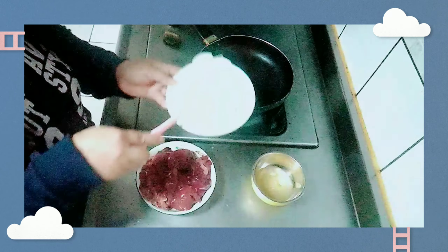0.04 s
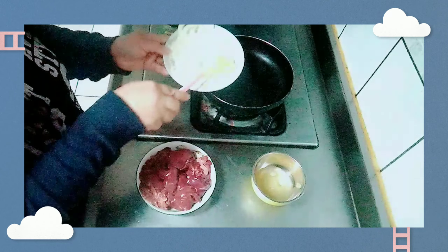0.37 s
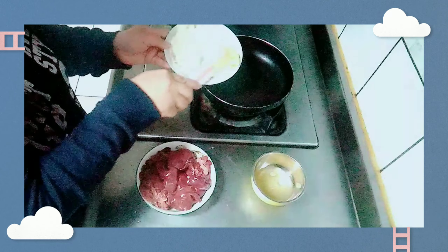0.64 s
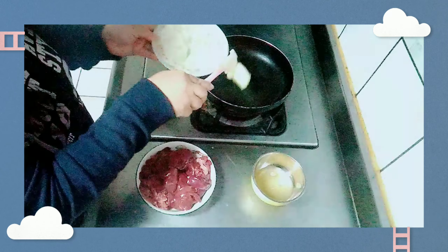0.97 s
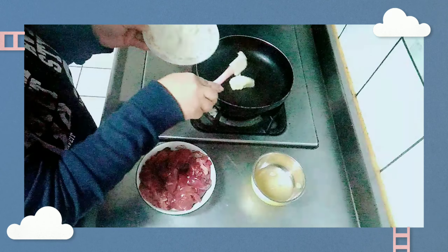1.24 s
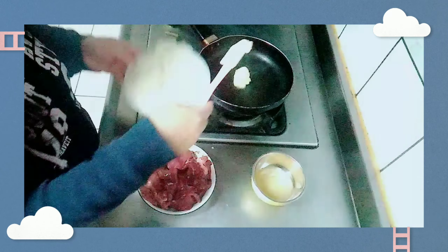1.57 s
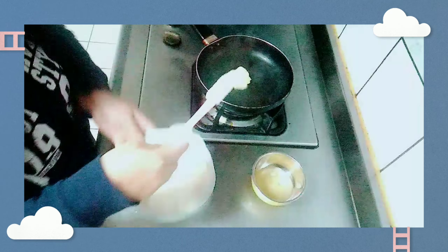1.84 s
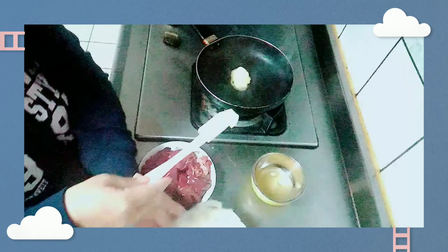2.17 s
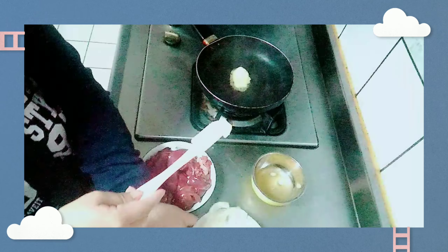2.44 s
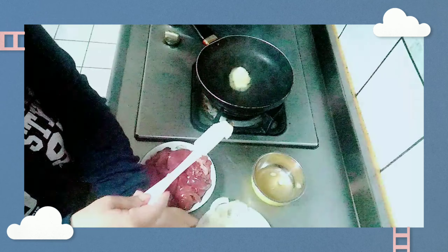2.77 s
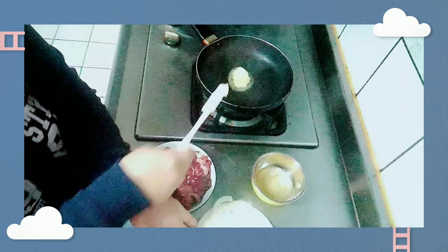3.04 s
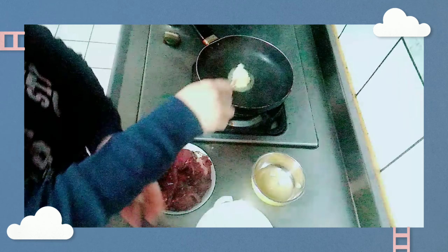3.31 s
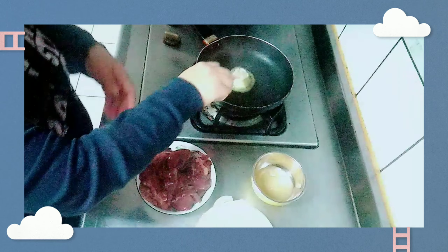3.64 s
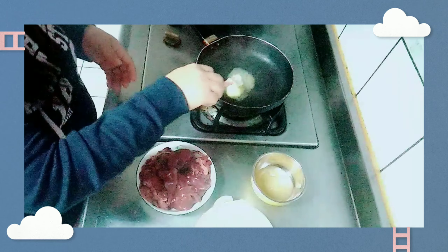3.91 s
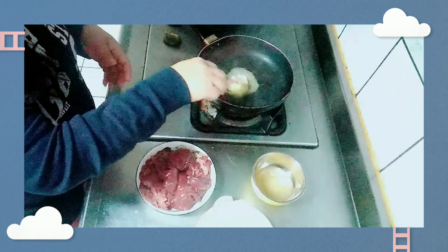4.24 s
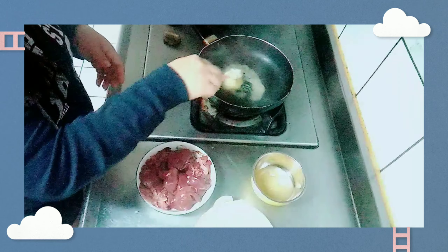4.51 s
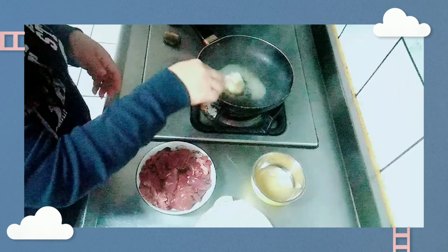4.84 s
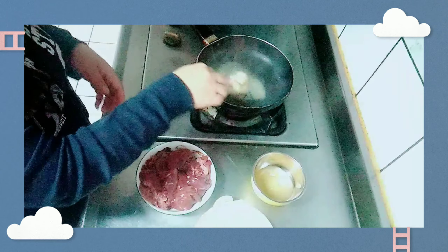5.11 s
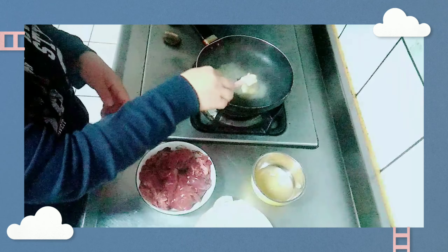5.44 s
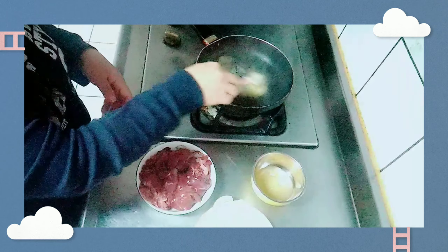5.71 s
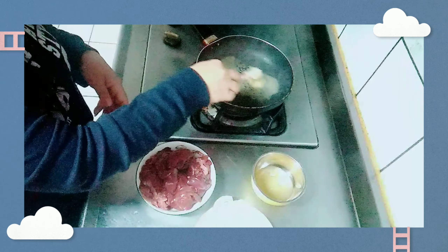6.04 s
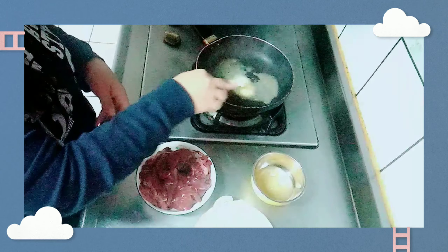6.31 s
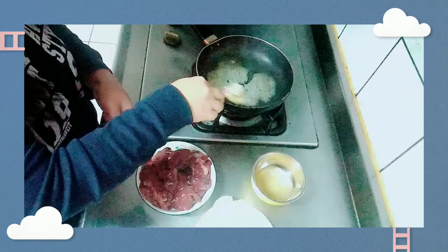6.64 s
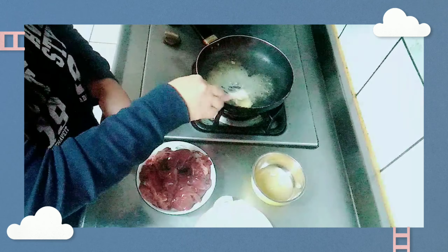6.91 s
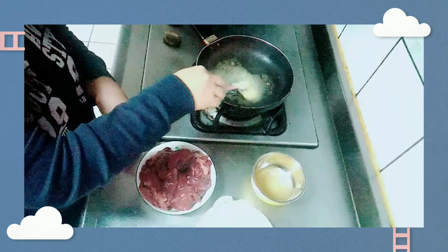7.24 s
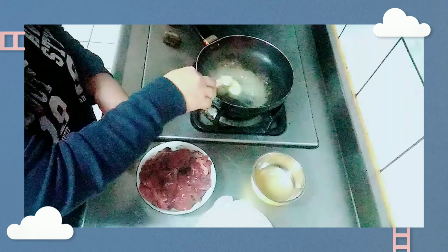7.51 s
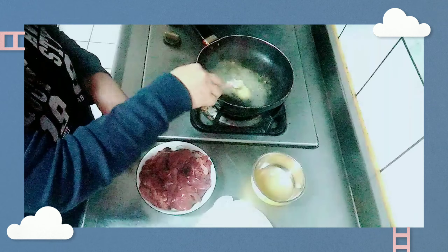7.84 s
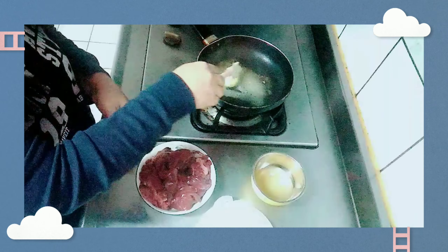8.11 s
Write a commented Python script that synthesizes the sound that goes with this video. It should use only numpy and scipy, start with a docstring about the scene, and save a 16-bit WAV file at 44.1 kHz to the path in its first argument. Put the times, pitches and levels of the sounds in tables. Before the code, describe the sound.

Butter sizzles and spits in a hot frying pan as a spatula stirs, with a plate knocking twice on a steel counter.

```python
"""Butter sizzles in a hot frying pan: its water boils out as tiny steam bubbles that fizz and shake the
pan, and bursting drops spit ever more often. The lump slides off a plate with a rustle and lands with
thuds and a splat; the plate is set on the steel counter with two ringing knocks. A spatula bumps,
ticks and squeaks on the pan, and the fizz swells as it spreads the fat. A gas burner rushes underneath.
The kitchen is small and tiled; the sound is mono, with the top treble cut off."""
import sys
import numpy as np
from scipy import signal
from scipy.fft import rfft, irfft, next_fast_len
from scipy.io import wavfile
from scipy.ndimage import uniform_filter1d

SR = 44100
rng = np.random.default_rng(int(sys.argv[2]) if len(sys.argv) > 2 else 0)


def transcribe(signal):
    """Save signal, clipped to [-1, 1], as a 16-bit WAV file at the path in sys.argv[1]."""
    frames = np.atleast_2d(signal).T
    limited = np.clip(frames, -1, 1)
    pcm = np.round(limited * 32767).astype(np.int16)
    wavfile.write(sys.argv[1], SR, pcm)


N = 369116
T = np.arange(N) / SR

# spatula strokes spreading fat over hot metal: (start [s], length [s], fizz lift [dB])
STROKES = [(3.45, 0.78, 1.3), (4.13, 0.89, 3), (5.323, 0.77, 5), (6.128, 0.88, 3), (7.48, 0.55, 1.2)]

def sizzle(land_s=0.85, touch_s=0.025, warm_up_s=0.3, drying_db_per_s=0.34, splash_t60_s=0.45):
    """The butter lands with a hiss, heats up, boils off its water in spurts and slowly dries."""
    age = since(land_s)
    strokes = [(arch(s, length, skew=0.87), db) for s, length, db in STROKES]
    stirring = sum(swell for swell, _ in strokes)
    lift_db = sum(db * swell for swell, db in strokes)
    splash = amp(-60 * age / splash_t60_s)
    cold_db = -23.5 * np.exp(-age / warm_up_s)
    boil = amp(-38 + cold_db - drying_db_per_s * age + lift_db)
    spurts = amp(0.94 * wander(rate_hz=24) - 0.11 * wander(rate_hz=7.8))
    frying = np.hypot(boil, amp(-46) * splash) * spurts * foam(age, stirring)
    return np.minimum(age / touch_s, 1) * (frying + pan_hum(lift_db, splash))


# fizz under the solid lump: (frequency [Hz], relative density [dB])
LUMP_SPECTRUM = [(1470, -45), (2500, -12.5), (2940, -13.5), (3180, -6.5), (3360, -3.5), (4290, -3),
                 (4680, -2), (6350, 1), (7360, -4.5), (7710, -17.5), (8450, -34), (11000, -67),
                 (18600, -120)]
# higher, thinner fizz: (frequency [Hz], relative density [dB])
THIN_SPECTRUM = [(1470, -43.5), (2500, -15.5), (2990, -24), (3540, -13), (4180, -5.5), (4560, -8),
                 (4970, -3), (6160, 2.5), (6790, 0), (7360, -8.5), (7750, -15), (8150, -38), (8450, -30),
                 (11000, -72.5), (18600, -120)]
# coarse bubbles: (frequency [Hz], relative density [dB])
COARSE_SPECTRUM = [(300, -27), (600, -11.5), (1000, -5), (1600, 3), (2200, 1), (2800, 3.5), (3400, 5),
                   (4500, -25.5)]
# thin fizz, all at landing, almost none by 1.75 s, then partly back: (time [s], share [0-1])
THIN_SHARE = [(0.9, 1), (1.35, 0.8), (1.75, 0.04), (3.2, 0.23), (4.5, 0.62), (8.3, 0.61)]

def foam(age, stirring, coarse_db=-16.5, stirred_db=2.5):
    """Fine bubbles shift between a fuller and a thinner fizz; stirring brings up the coarse ones."""
    thin = np.interp(T, *np.transpose(THIN_SHARE))
    spread_db = 0.75 + 0.266 * age  # sizes grow more unequal as the fat heats
    fine = bubbles(per_s=5000, spread_db=spread_db, lo_hz=2116, hi_hz=8520, cycles=2.1, room_db=-2)
    fizz = (1 - thin) * coloured(fine, LUMP_SPECTRUM) + thin * coloured(fine, THIN_SPECTRUM)
    coarse = bubbles(per_s=2200, spread_db=spread_db, lo_hz=517, hi_hz=4010, cycles=0.67, room_db=4)
    return fizz + amp(coarse_db + stirred_db * stirring) * coloured(coarse, COARSE_SPECTRUM)


def bubbles(per_s, spread_db, lo_hz, hi_hz, cycles, room_db, pitches=12, spot_count=4):
    """Steam bubbles burst at random, each a short ping; most are tiny, a few large."""
    sizes = amp(spread_db * np.minimum(rng.exponential(1, N), 5))
    sizes /= np.sqrt(uniform_filter1d(sizes ** 2, size=20001))
    bursts = sizes * (rng.random(N) < per_s / SR)
    pitch_index = rng.integers(0, pitches, N)
    t = np.arange(512) / SR
    spots = np.zeros((spot_count, N))  # each spot in the pan has its own echoes
    for k, hz in enumerate(np.linspace(lo_hz, hi_hz, pitches)):
        ping = np.sin(2 * np.pi * hz * t) * np.exp(-t * hz / cycles)
        spots[k % spot_count] += signal.oaconvolve(bursts * (pitch_index == k), unit_rms(ping))[:N]
    return sum(spot + amp(room_db) * kitchen(spot)[:N] for spot in spots)


# lower pan modes rung by the boiling: (frequency [Hz], width [Hz], gain [dB])
BOIL_MODES = [(309.2, 49, -43.5), (712, 88, -46.5), (933, 120, -47), (1077, 38, -48)]

def pan_hum(lift_db, splash, seated_s=1.038, rise_s=0.21, fade_s=0.23, sag_s=0.6):
    """Boiling shakes the pan bottom; the hum sags and fades as the lump melts."""
    age = since(seated_s)
    level_db = -49 - 16 * np.log10(1 + age / fade_s) + 0.8 * lift_db
    drive = np.minimum(age / rise_s, 1) * amp(level_db) + amp(-48) * splash
    hum = resonant_noise(hz=1361 + 110 * np.exp(-age / sag_s), width_hz=120)
    body = sum(amp(db) * resonant_noise(hz, width) for hz, width, db in BOIL_MODES)
    return drive * hum + drive ** 0.38 * body  # lower modes swell less


# loudest spits: (time [s], peak [dB], centre [Hz])
LOUD_SPITS = [(2.471, -21, 5150), (3.6769, -25, 5400), (6.1399, -22, 5850), (6.33, -25, 6200),
              (6.5502, -17.5, 6100), (6.6412, -27, 5750), (7.4697, -22.5, 5200), (7.5679, -28, 5600),
              (7.7564, -24, 5500), (7.8824, -24.5, 5450), (7.9516, -22, 6350), (8.0834, -28, 6000),
              (8.1619, -18.5, 4400), (8.2652, -22, 5900), (8.2861, -23, 6200)]

def spits(patter_from_s=3.5, growth_per_s2=2.4, patter_db=-28.5, patter_hz=5600, candidates=200):
    """Water drops burst in hot fat: a few loud spits and a thickening random patter."""
    times, chance = (rng.random((candidates, 2)) * [N / SR, candidates * SR / N]).T
    size, pitch = rng.standard_normal((candidates, 2)).T
    patter = np.column_stack([times, patter_db + 2.6 * size, patter_hz * 2 ** (0.1 * pitch)])
    rate_per_s = growth_per_s2 * (times - patter_from_s)
    out = np.zeros(N)
    for s, peak_db, hz in [*LOUD_SPITS, *patter[chance < rate_per_s]]:
        add(out, s, amp(peak_db) * snap(hz, octaves=0.38, echo_db=-5.5))
    return out


# band shared by spits and ticks: (frequency [Hz], relative density [dB])
SNAP_SPECTRUM = [(100, -35), (800, -7.5), (1500, 5), (6800, 4.5), (7500, -2.5), (8400, -41)]

def snap(centre_hz, octaves, echo_db):
    """A sharp pulse scattered in the pan, at peak 1, plus its room echo."""
    def gain_db(hz):
        detuning = np.log2((hz + 1) / centre_hz) / octaves
        return at_hz(SNAP_SPECTRUM, hz) - 20 * np.log10(1 + detuning ** 2)

    pulse = scatter(click(gain_db), decay_s=0.0011, strength=0.28)
    pulse /= abs(pulse).max()
    sound = amp(echo_db) * kitchen(pulse, build_s=0.0017)
    add(sound, 0, pulse)
    return sound


# plate on counter: (time [s], level [dB], contact [0 rim, 1 foot], relative clatter [dB])
PLATE_CONTACTS = [(2.3484, -1.5, 0.064, 3), (2.354, -9.5, 0.92, -3), (2.8122, -6.5, 1, 3.5),
                  (2.8152, -6, 0.61, -0.5), (2.8314, -12, 0.46, -2)]
# crack of the rim: (frequency [Hz], relative density [dB])
RIM_SPECTRUM = [(41, -40.5), (70, -9), (308, -4.5), (551, -9), (1160, -1), (1440, 0.5), (1760, -3),
                (2280, -13), (2740, -2.5), (3210, 2.5), (3850, -18.5), (4610, -5.5), (5090, -12),
                (6880, -7), (8400, -49), (10900, -75), (18500, -120)]
# crack of the foot: (frequency [Hz], relative density [dB])
FOOT_SPECTRUM = [(65, -52.5), (110, -25), (277, -7), (429, -10), (1230, -6.5), (1390, -13.5), (1610, -2),
                 (1830, -14.5), (2120, -5.5), (2580, -5), (2830, -4), (4290, -4), (5950, -11), (7270, -16),
                 (8400, -54), (10900, -73), (18500, -120)]
# plate and counter modes: (frequency [Hz], rim gain [dB], foot gain [dB], t60 [s])
PLATE_MODES = [(286, -9.5, 5.5, 0.19), (510, -14, -7, 0.22), (576, -15, -26.5, 0.78),
               (847, -0.5, -0.5, 0.15), (950, -13, -5, 0.29), (988, -5, -3, 0.27), (1149, 6, -6, 0.12),
               (1250, -4.5, 2, 0.18), (1490, -11, -22, 0.35), (2390, -17, -9.5, 0.22), (2737, -8, -7, 0.38),
               (3030, -11, -7, 0.49), (2890, -8, 0, 0.28), (3140, -9, 0, 0.1), (3110, -5, -4, 0.23),
               (3480, -6.5, -9.5, .27), (3288, -3, -14, 0.11), (3920, -19.5, -5, 0.67),
               (4350, -8.5, -19, .35)]

def plate_knocks(ring_db=-31):
    """Each contact gives a crack, a diffuse clatter of counter and room, and the plate's ring."""
    out, t = np.zeros(N), np.arange(SR // 2) / SR
    for s, level_db, foot, clatter_db in PLATE_CONTACTS:
        pulse = click(lambda hz: (1 - foot) * at_hz(RIM_SPECTRUM, hz) + foot * at_hz(FOOT_SPECTRUM, hz))
        crack = amp(level_db) * pulse
        add(out, s, scatter(crack, decay_s=0.0026, strength=0.18))
        add(out, s, amp(clatter_db) * kitchen(crack, build_s=0.0091))
        for hz, rim_db, foot_db, t60 in PLATE_MODES:
            mode_db = level_db + ring_db + (1 - foot) * rim_db + foot * foot_db
            add(out, s, rng.choice([-1, 1]) * amp(mode_db - 60 * t / t60) * np.sin(2 * np.pi * hz * t))
    return out


# butter, then spatula, bumping the pan: (time [s], gain [dB], contact time [s])
PAN_BLOWS = [(0.8451, -31.5, 0.0032), (0.8743, -37, 0.00064), (0.904, -36, 0.0017), (3.722, -41, 0.00091),
             (4.01, -48, 0.0019), (5.861, -49, 0.0016), (7.693, -46.5, 0.0023)]
# pan on its support: (frequency [Hz], gain [dB], t60 [s])
PAN_MODES = [(98.2, -3, 0.29), (164, -4.5, 0.18), (173.6, -12.5, 0.2), (293.2, -14.5, 0.59),
             (315, -3, 0.25), (1075, -6.5, 0.12), (1373, 4, 0.11), (1452, 3.5, 0.1), (1536, 4.5, 0.083)]

def pan_blows(press_s=0.0048):
    """Soft blows ring the pan; the longer the contact, the duller the ring."""
    out, t = np.zeros(N), np.arange(SR // 2) / SR
    pressing = np.sin(np.pi / 2 * np.minimum(t / press_s, 1)) ** 2  # fat and rubber load it gradually
    for s, gain_db, contact_s in PAN_BLOWS:
        ring = 0
        for hz, db, t60 in PAN_MODES:
            contact_cycles = hz * contact_s
            coupling = 2 * contact_cycles / (0.5 + 3 * contact_cycles ** 2)
            ring += coupling * amp(db - 60 * t / t60) * np.sin(2 * np.pi * hz * t)
        add(out, s, amp(gain_db) * ring * pressing)
    return out


# sharp ticks on the pan: (time [s], peak [dB], centre [Hz], relative echo [dB])
PAN_TICKS = [(0.8782, -32.5, 4900, 0), (3.479, -16.5, 4400, -1.5), (7.753, -22.5, 5200, -4)]

def pan_ticks():
    """The butter's landing splat, then two spatula ticks: all wider in band than a spit."""
    out = np.zeros(N)
    for s, peak_db, hz, echo_db in PAN_TICKS:
        add(out, s, amp(peak_db) * snap(hz, octaves=1.56, echo_db=echo_db))
    return out


# spatula slips: (start [s], length [s], starting pitch [Hz], level [dB])
SLIPS = [(7.847, 0.016, 4600, -36.5), (7.88, 0.05, 4900, -40.5)]

def spatula_squeaks(rise_hz_per_s=7000):
    """Each slip on the greased pan makes a short, rough, rising whistle."""
    out = np.zeros(N)
    for s, length, start_hz, db in SLIPS:
        hz = start_hz + rise_hz_per_s * np.minimum(since(s), length)
        out += amp(db) * arch(s, length) * resonant_noise(hz, width_hz=1100)
    return out


# sleeve and spatula rustles: (peak time [s], level [dB])
RUSTLE_PEAKS = [(0.01, -52.5), (0.34, -57.5)]
# cloth and plastic: (frequency [Hz], relative density [dB])
RUSTLE_SPECTRUM = [(90, 2), (170, -9), (310, 3), (480, -3), (750, -5), (1300, -10), (4000, -42)]

def rustle(rise_s=0.11, t60_s=0.53, uneven_db=2):
    """Sleeve and spatula rustle dully as the butter is pushed off the plate."""
    level = sum(np.clip(1 + (T - s) / rise_s, 0, 1) * amp(db - 60 * since(s) / t60_s)
                for s, db in RUSTLE_PEAKS)
    uneven = amp(uneven_db * wander(rate_hz=44))
    return level * uneven * coloured(rng.standard_normal(N), RUSTLE_SPECTRUM)


# burner and room noise: (frequency [Hz], relative density [dB])
BURNER_SPECTRUM = [(25, -35.5), (54, -4.5), (100, -6), (130, -12.5), (175, -11), (220, -18), (300, -16),
                   (380, -18), (700, -21.5), (1500, -24.5), (2600, -29.5), (4000, -33.5), (6300, -37.5),
                   (7400, -49), (8200, -73.5)]

def burner(rush_db=-57.5, flutter_db=0.5, mains_db=-68):
    """The gas flame's rush flutters in the bass and is steady above, over a faint mains hum."""
    rush = amp(rush_db) * coloured(rng.standard_normal(N), BURNER_SPECTRUM)
    bass = signal.sosfiltfilt(signal.butter(2, 400, fs=SR, output="sos"), rush)
    flutter = amp(flutter_db * wander(rate_hz=11)) - 1
    return rush + bass * flutter + amp(mains_db) * np.sin(2 * np.pi * 60 * T)


# kitchen reverberation: (frequency [Hz], t60 [s])
KITCHEN_T60 = [(200, 0.29), (600, 0.43), (1400, 0.29), (3200, 0.29), (7000, 0.11)]

def kitchen(x, build_s=0.02, size=20000):
    """Dense reflections from tiles and steel build up, then each band dies at its own rate."""
    build_up = np.sqrt(1 - np.exp(-np.arange(size) / SR / build_s))
    taps = rng.choice([-1, 1], size) * (rng.random(size) < 0.12) * build_up
    hz, t, bands = signal.stft(taps, SR, nperseg=256)
    decay = amp(-60 * t / at_hz(KITCHEN_T60, hz)[:, None])
    tail = signal.istft(bands * decay, SR, nperseg=256)[1]
    return signal.fftconvolve(x, tail / np.linalg.norm(tail))


def scatter(x, decay_s, strength, size=1024):
    """A pulse and its first quick reflections from nearby metal."""
    t = np.arange(size) / SR
    reflections = strength * rng.standard_normal(size) * np.exp(-t / decay_s)
    return np.convolve(x, (t == 0) + reflections)


def resonant_noise(hz, width_hz):
    """Noise through a resonance at hz (number or curve), at rms 1."""
    carrier = np.exp(2j * np.pi * np.cumsum(hz * np.ones(N)) / SR)
    pole = np.exp(-np.pi * width_hz / SR)
    baseband = signal.lfilter([1], [1, -2 * pole, pole * pole], rng.standard_normal(N) / carrier)
    return unit_rms((carrier * baseband).real)


def click(gain_db, size=4096):
    """Minimum-phase pulse of energy 1 with the spectral shape gain_db(hz)."""
    log_gain = np.log(amp(gain_db(abs(np.fft.fftfreq(size, 1 / SR)))) + 1e-5)
    pulse = np.fft.ifft(np.exp(np.conj(signal.hilbert(log_gain)))).real
    return pulse / np.linalg.norm(pulse)


def coloured(x, spectrum):
    """Filters by a spectrum table, to rms 1."""
    return unit_rms(signal.oaconvolve(x, click(lambda hz: at_hz(spectrum, hz)))[:N])


def wander(rate_hz):
    """Slow random curve of rms 1."""
    size = next_fast_len(N)
    hz = np.fft.rfftfreq(size, 1 / SR)
    return unit_rms(irfft(rfft(rng.standard_normal(size)) / (1 + (hz / rate_hz) ** 2), size)[:N])


def arch(start_s, length_s, skew=1):
    """Swells from 0 to 1 and back; skew under 1 peaks early."""
    return np.sin(np.pi * np.clip((T - start_s) / length_s, 0, 1) ** skew)


def since(s):
    """Seconds since s, 0 before it."""
    return np.maximum(T - s, 0)


def at_hz(table, hz):
    """Interpolates on a log-frequency axis."""
    table_hz, values = np.transpose(table)
    return np.interp(np.log(hz + 1), np.log(table_hz + 1), values)


def add(mix, s, sound):
    """Mixes a sound in at s seconds."""
    part = mix[round(s * SR):][:len(sound)]
    part += sound[:len(part)]


def amp(db):
    """Decibels to gain."""
    return 10 ** (np.asarray(db) / 20)


def unit_rms(x):
    """Scales to rms 1."""
    return x / np.sqrt(np.mean(x ** 2) + 1e-20)


def scene():
    """Everything at the stove, in one channel."""
    return (sizzle() + pan_blows() + plate_knocks() + spits()
            + pan_ticks() + spatula_squeaks() + rustle() + burner())[None]


def record(dry, cutoff_hz=8550):
    """A steep low-pass cuts the top treble."""
    low_pass = signal.firwin(511, cutoff_hz, window=("kaiser", 9), fs=SR)
    return signal.oaconvolve(dry, low_pass[None], "same")


dry = scene()
out = record(dry)
transcribe(out)
```